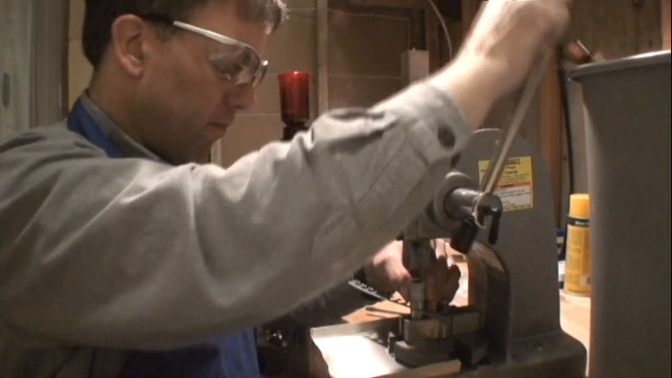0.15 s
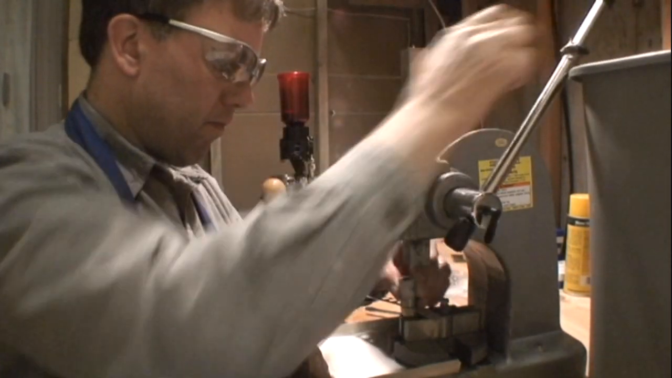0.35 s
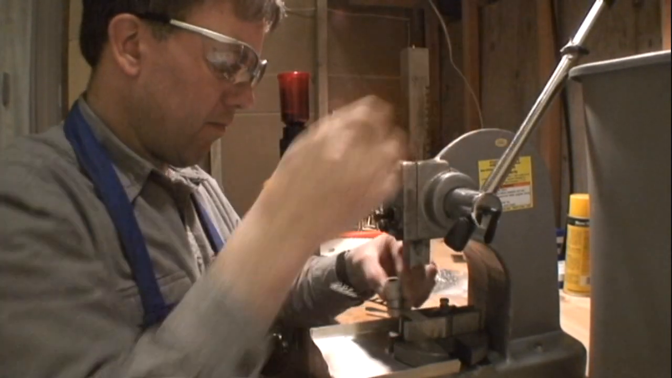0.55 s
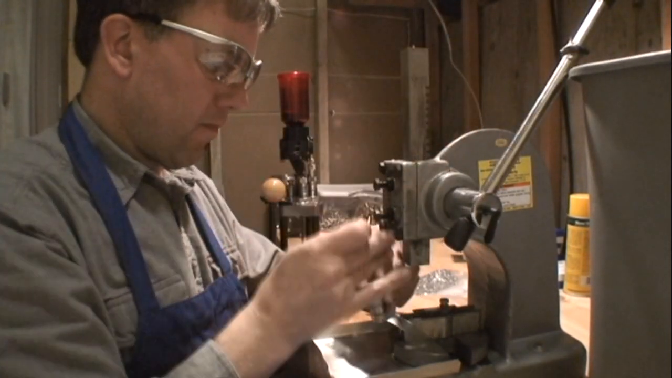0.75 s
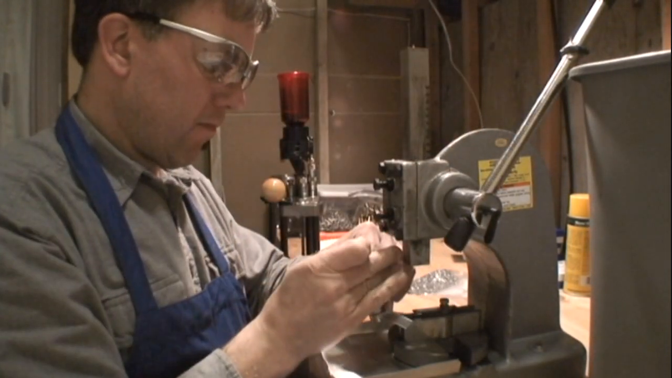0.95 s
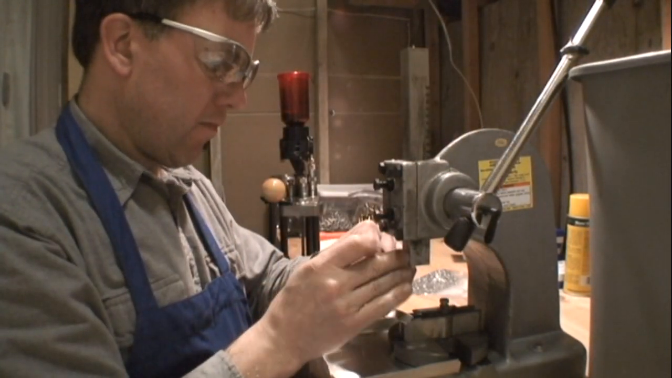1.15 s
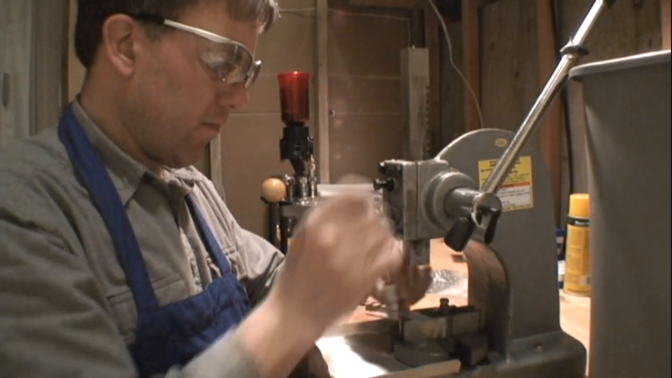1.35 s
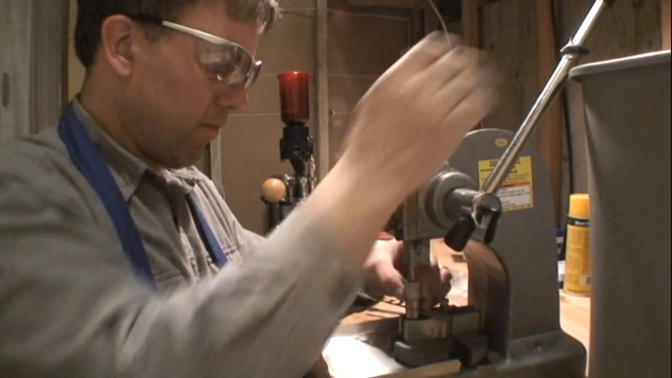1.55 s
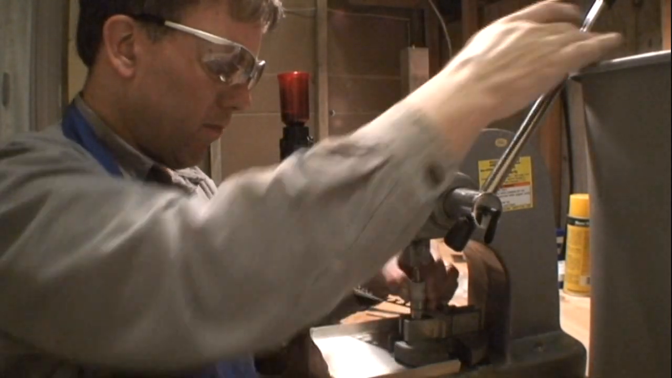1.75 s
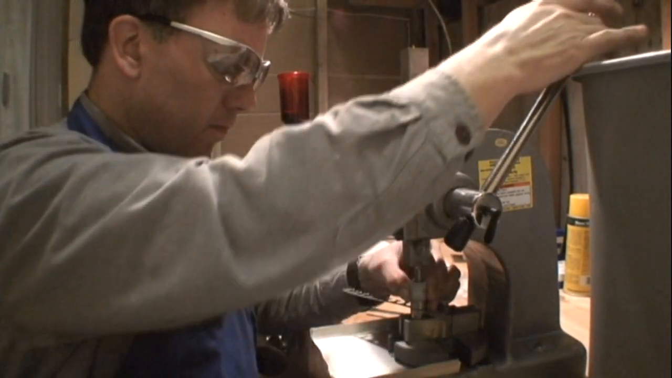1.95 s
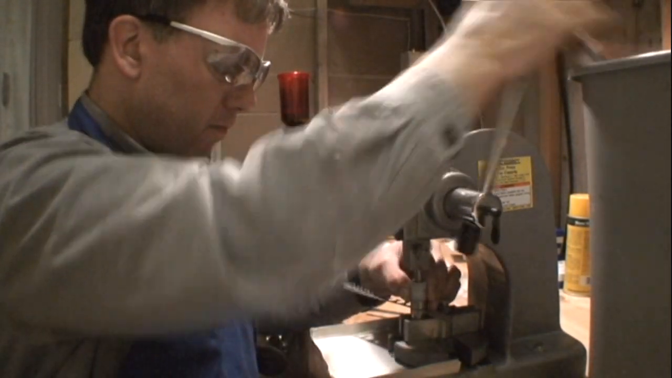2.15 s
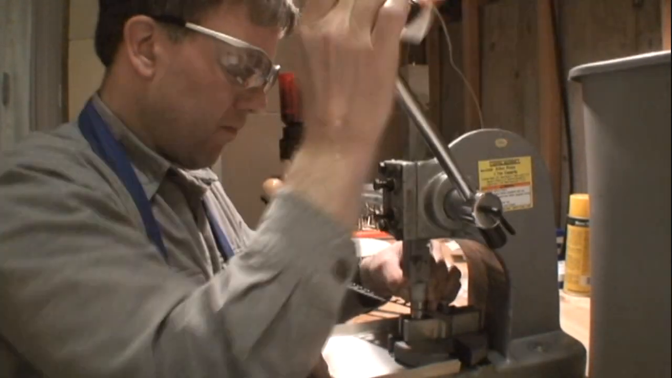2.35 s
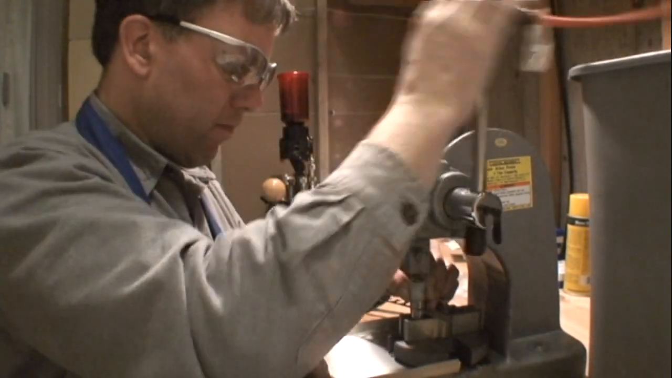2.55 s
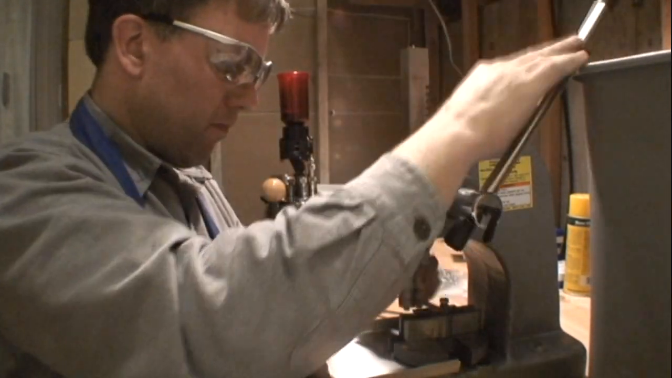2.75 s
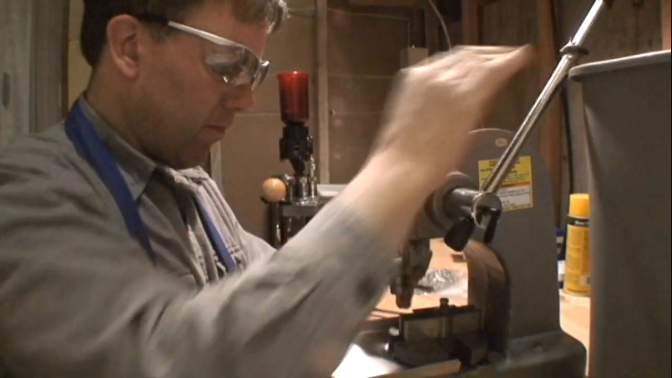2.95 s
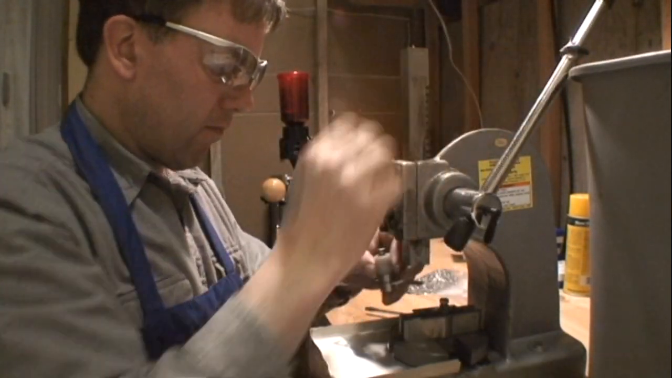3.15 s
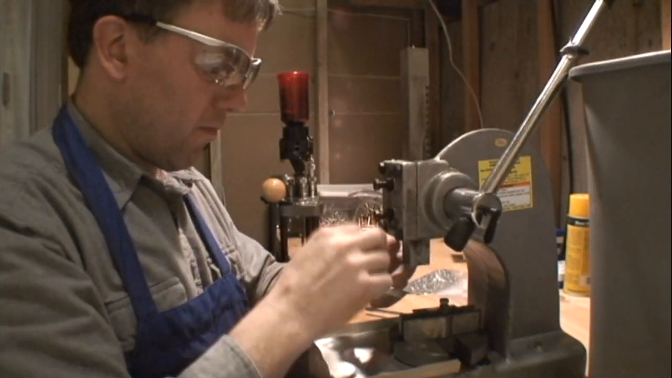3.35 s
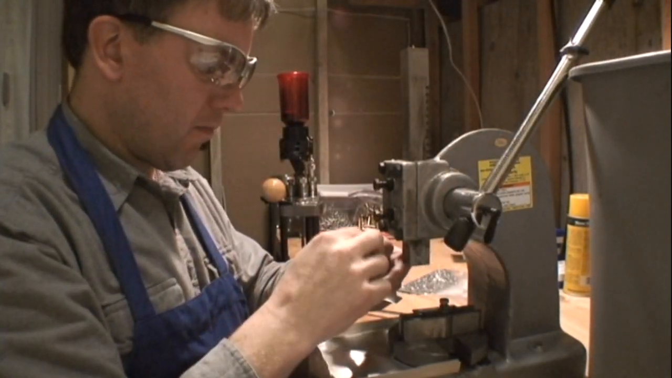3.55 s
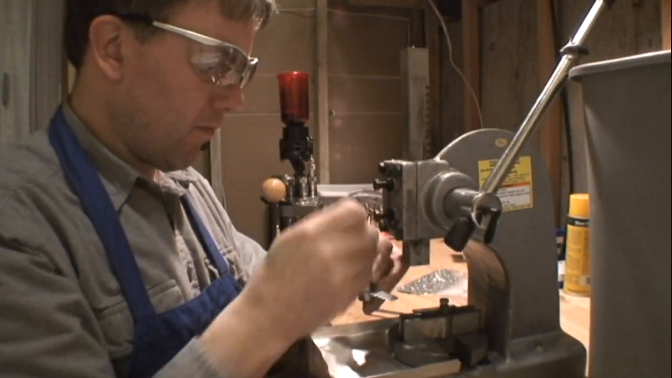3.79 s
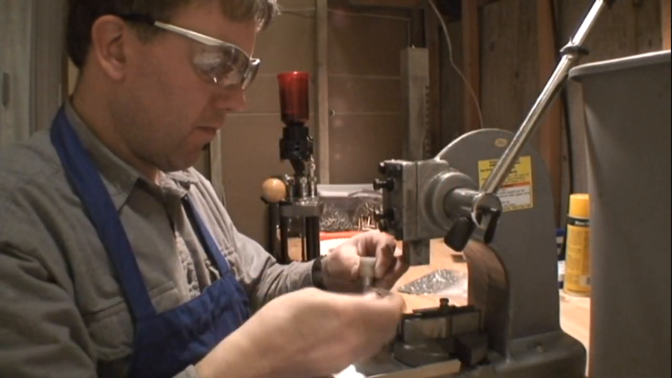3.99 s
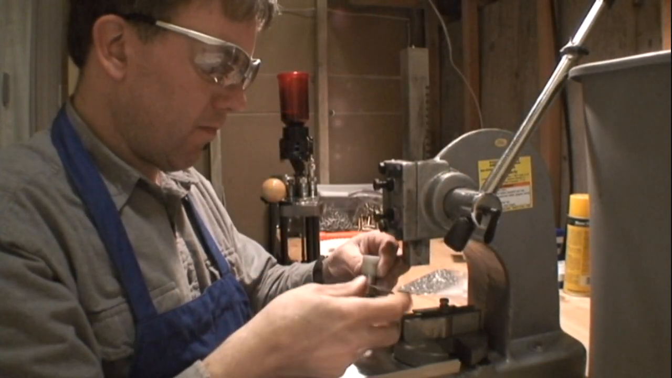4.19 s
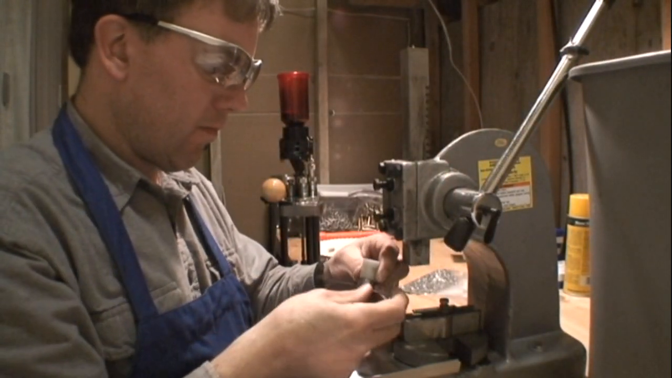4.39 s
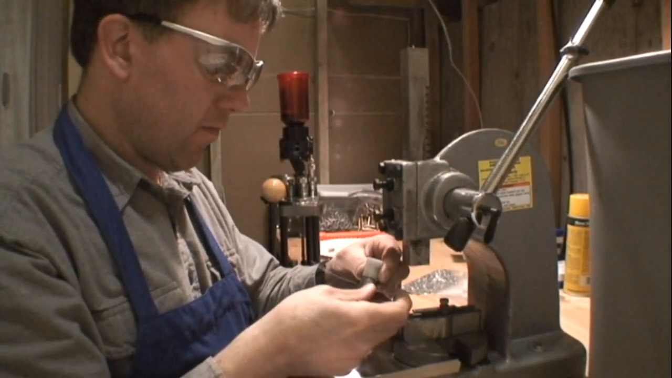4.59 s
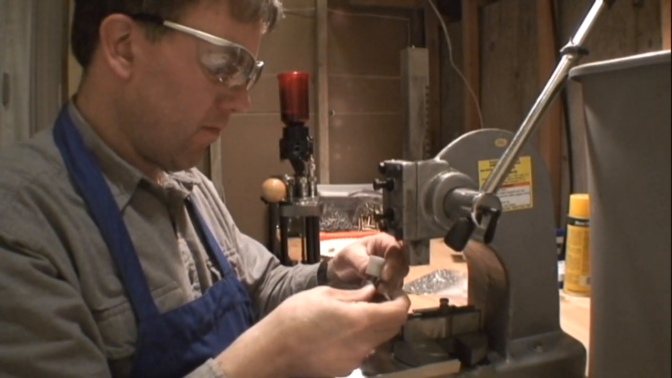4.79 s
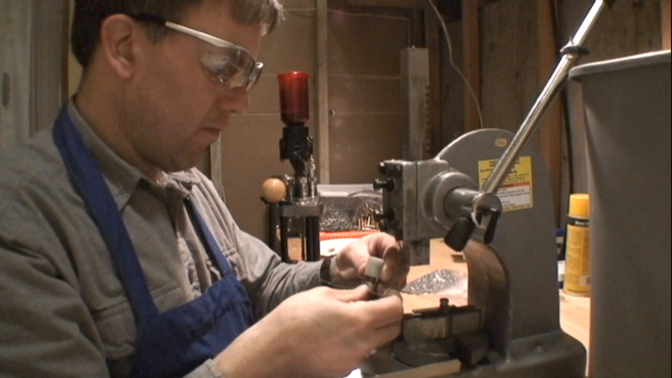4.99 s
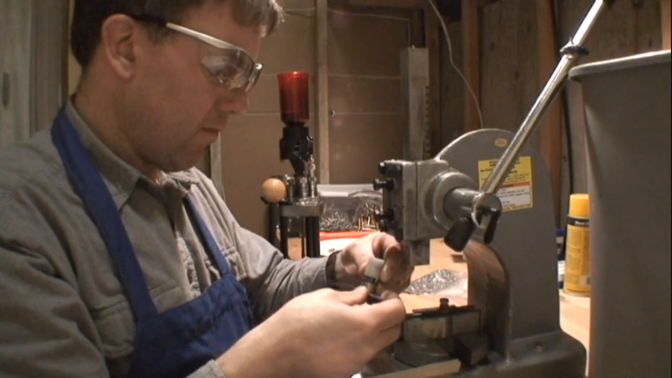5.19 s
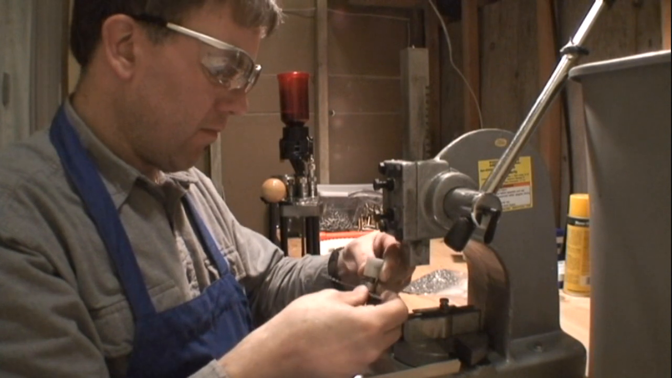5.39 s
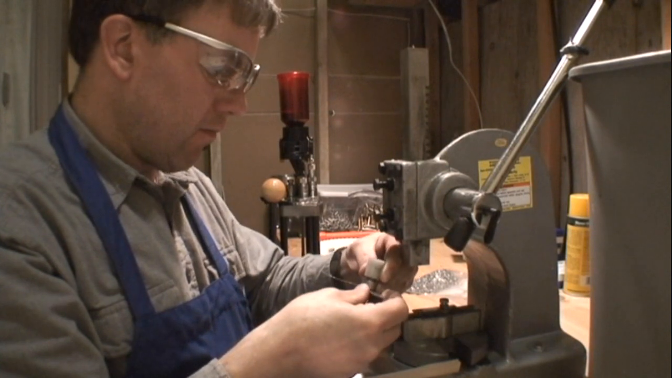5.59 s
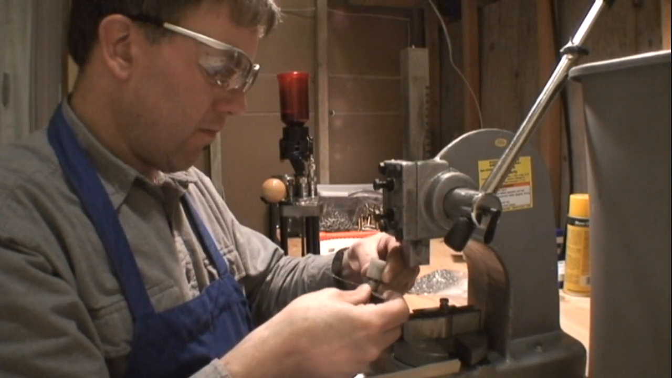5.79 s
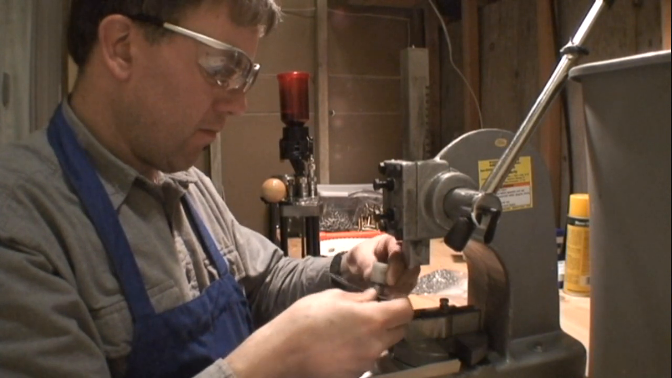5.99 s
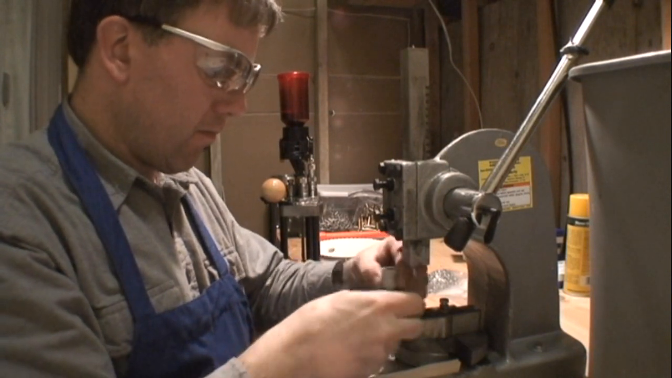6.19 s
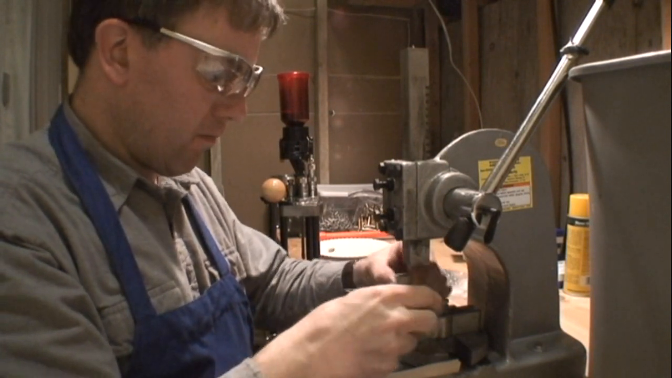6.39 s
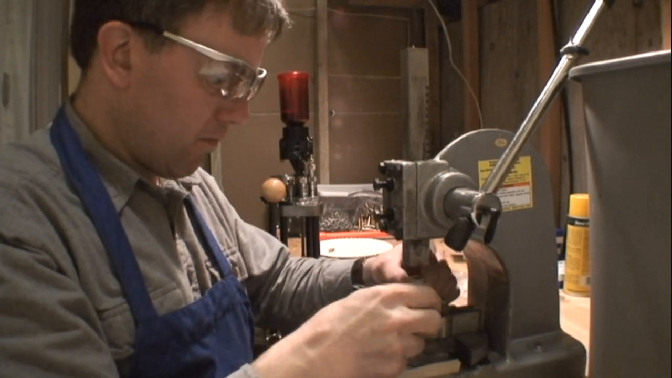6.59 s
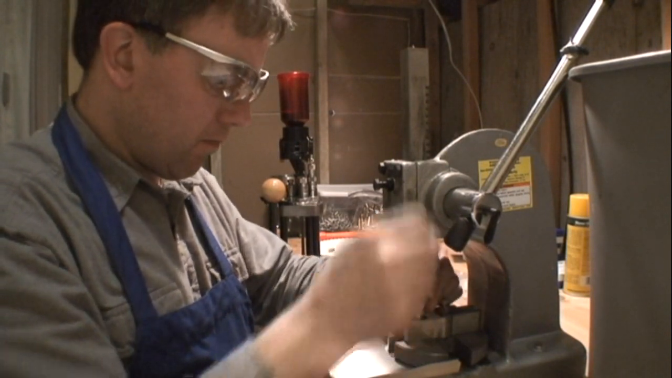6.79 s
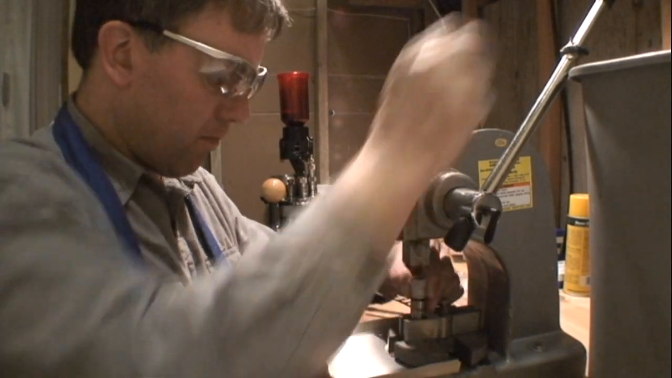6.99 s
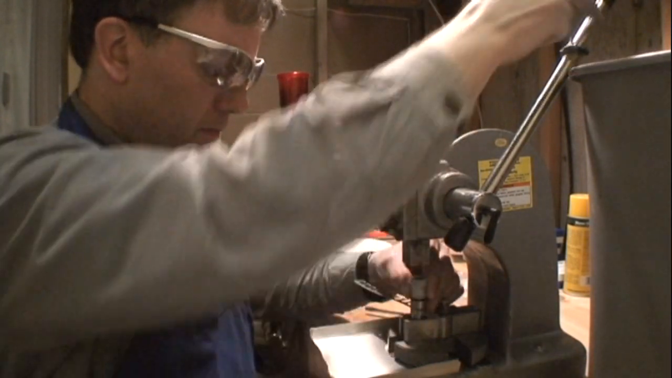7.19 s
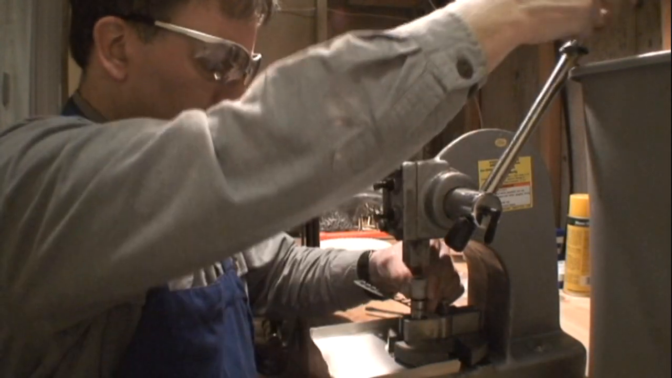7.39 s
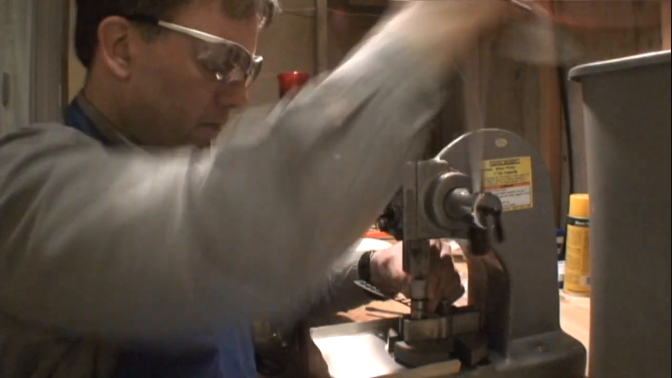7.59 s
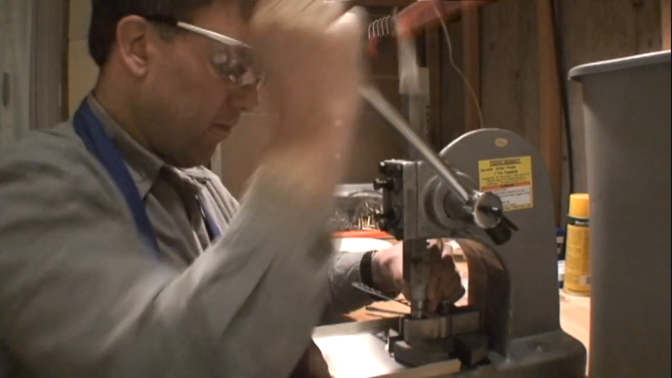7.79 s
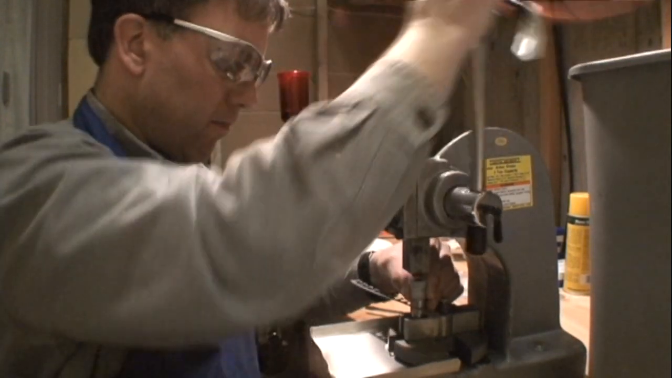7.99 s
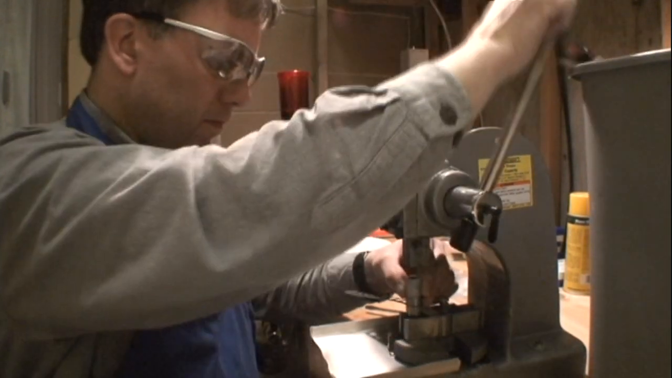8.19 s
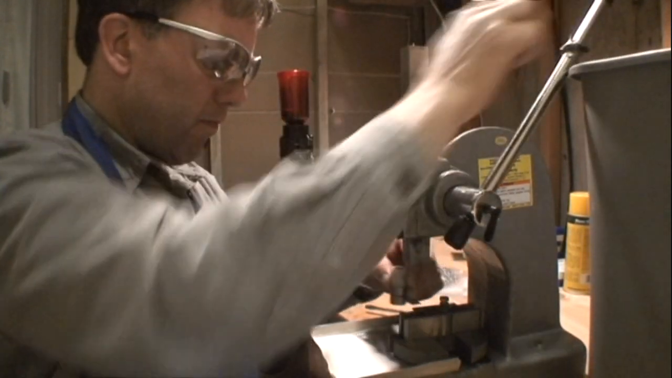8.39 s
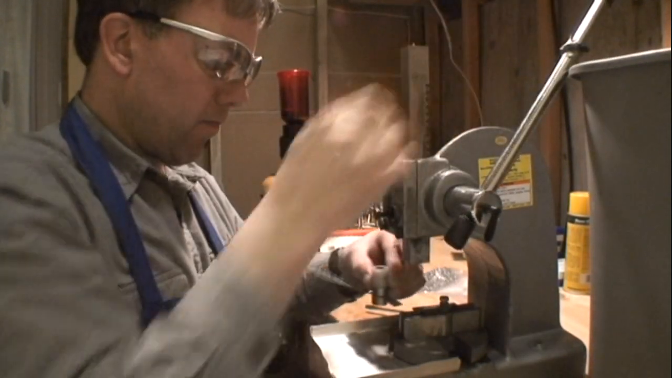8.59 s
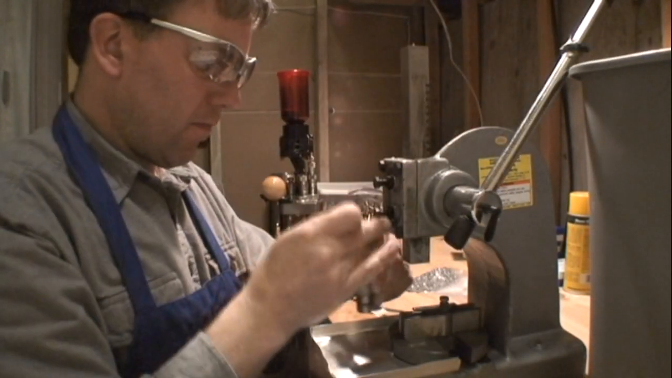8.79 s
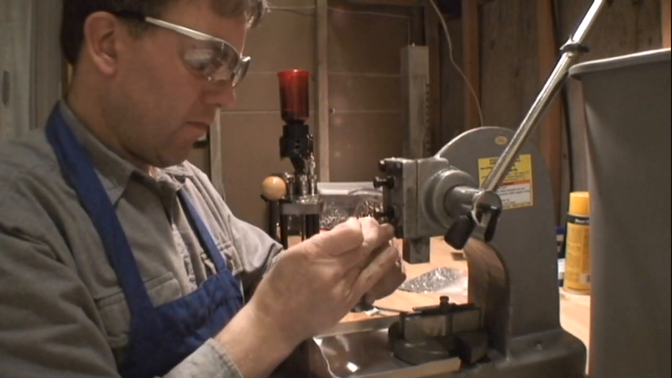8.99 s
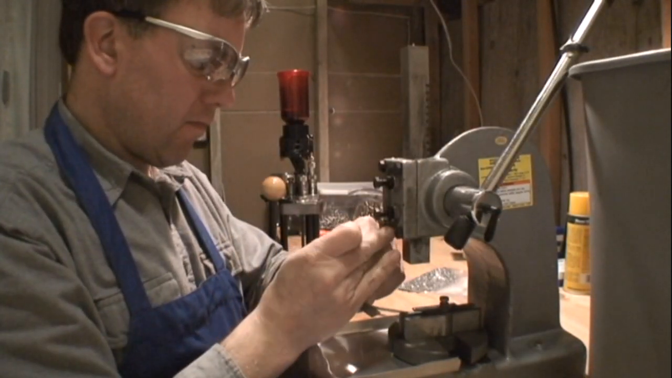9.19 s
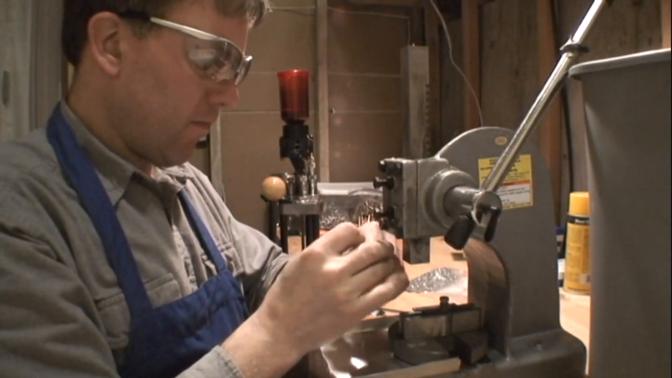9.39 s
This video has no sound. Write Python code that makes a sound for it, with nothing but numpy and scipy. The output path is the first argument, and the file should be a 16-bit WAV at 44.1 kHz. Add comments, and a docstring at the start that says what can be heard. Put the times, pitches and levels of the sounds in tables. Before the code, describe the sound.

In a small workshop, heard close in stereo, an iron lever press finishes a stroke with a double clank. Thin metal strip ticks and clinks on the die, then a stroke cracks and grinds through it and the lever and ram knock back. Lighter ticks and a brief scrape follow in a quieter gap before a second crunching stroke, another return clank and fine ticks. A sleeve rustles over faint hum.

```python
"""A hand-lever press cracks and grinds a punch through metal strip; then the lever knocks on its stop and the ram lands.
Between strokes the strip ticks, scrapes and clinks on the die, while a sleeve rustles over mains hum and still air.
Blows layer filtered noise, dense echoes and damped modes; tearing, judder and scraping are random impulses
played through such responses; cloth, air and bench sway are coloured noise, and the hum is a stack of sines."""
import sys
import numpy as np
from scipy import signal
from scipy.fft import rfft, irfft, next_fast_len
from scipy.io import wavfile
from scipy.ndimage import map_coordinates

SR = 44100
rng = np.random.default_rng(int(sys.argv[2]) if len(sys.argv) > 2 else 0)


def to_wav(sig):
    """Store sig (one row per channel, or 1-D mono) as 16-bit WAV at the path in sys.argv[1].

    Samples outside -1..1 are clipped; the rate is SR.
    """
    pcm = np.clip(np.atleast_2d(sig), -1, 1) * 32767
    pcm = np.round(pcm).astype(np.int16)
    wavfile.write(sys.argv[1], SR, pcm.T)  # frames by channels


N = 416744
RING = np.arange(SR // 2) / SR  # the time axis of one blow, s

# resonances of press and bench: (f/Hz, mean level/dB, t60/s)
PRESS_MODES = [(134, -17, 0.4), (251, -2, 0.2), (290, -9, 0.34), (387.9, 5.5, 0.13), (455.3, 0, 0.12),
               (614.4, -1, 0.23), (670, -3, 0.28), (913, 1, 0.14), (1049, -4.5, 0.13), (1257, -3, 0.25),
               (1376, -5.5, 0.15), (1522, -5.5, 0.2), (1590, -2, 0.13), (1885, -10, 0.2),
               (2570, -15.5, 0.249)]
# resonances of the strip on the die: (f/Hz, mean level/dB, t60/s)
DIE_MODES = [(1974, -7, 0.12), (2680, 6.5, 0.04), (3000, -17.5, .12), (3440, -0.5, 0.1), (3750, -4.5, 0.12),
             (4265, -12.5, 0.068), (4840, -0.5, 0.095), (5070, -4, 0.06), (6500, 0, 0.06),
             (7700, -0.5, 0.087), (8060, 1, 0.033), (8336, -1.5, 0.066)]
# tone colour of the shaken bench: (f/Hz, gain/dB)
BENCH_COLOUR = [(50, -13), (100, -7.5), (190, -5), (280, -6), (380, 1), (520, -3), (700, -7.5),
                (1100, -7.5), (1550, -7), (2100, -12.5), (3000, -22), (6000, -53), (16000, -76)]
# how long the bench's echoes last: (f/Hz, t60/s)
BENCH_DECAY = [(80, 0.39), (300, 0.22), (1000, 0.28), (2500, 0.21), (8000, .15)]
# how long the room's echoes last: (f/Hz, t60/s)
ROOM_DECAY = [(300, 0.33), (2000, 0.23), (5000, 0.18), (9000, 0.13), (15000, 0.064)]
# the punch working through the strip: (bite t/s, run-up/s, length/s, groan level/dB, drone level/dB,
# grinding level/dB, thud of its blows relative to their clang/dB before the trims in blow())
CUTS = [(2.298, 0.02, 0.22, -22.5, -27.5, -19, -8.5), (7.779, 0.069, 0.12, -19, -21, -21, -15)]
# the lever swings back to its stop and the ram follows:
# (lever t/s, lever level/dB, ram t/s, ram level/dB, length of the lift/s); levels before the trims in blow()
RETURNS = [(0.291, -7.5, 0.331, -2.5, 0.15), (2.821, -5.5, 2.853, -2.5, 0.12),
           (8.337, -10.5, 8.390, -8, 0.286)]
CUT_RELEASE_S = 0.038  # time constant as the load lets go


def amp(db):
    """Decibels to gain."""
    return 10 ** (np.asarray(db) / 20)


def unit(x):
    """Scale to rms 1 in the mid channel."""
    return x / np.sqrt(np.mean(x[0] ** 2) + 1e-20)


def unit_attack(x, size=512):
    """Scale a blow to mid rms 1 over its first moments (size in samples)."""
    return x / np.sqrt(np.mean(x[0, :size] ** 2) + 1e-20)


def along(points, hz):
    """Read (f/Hz, value) points along a log frequency axis."""
    f, v = np.transpose(points)
    return np.interp(np.log(hz + 1), np.log(f + 1), v)


def wobble(rate):
    """A smooth random curve, rate knots a second."""
    knots = rng.standard_normal(int(N * rate / SR) + 4)
    coarse = np.arange(0, N, 64)
    return np.interp(np.arange(N), coarse, map_coordinates(knots, [coarse * rate / SR]))


def coloured(x, colour):
    """Causal minimum-phase filter with the gain of (f/Hz, gain/dB) points."""
    m = 2 * next_fast_len(x.shape[-1] // 2 + 2048)
    cepstrum = irfft(np.log(amp(along(colour, np.fft.rfftfreq(m, 1 / SR)))))
    # folding the cepstrum forward puts the energy as early as possible
    cepstrum[1:m // 2] *= 2
    cepstrum[m // 2 + 1:] = 0
    return irfft(rfft(x, m) * np.exp(rfft(cepstrum)), m)[..., :x.shape[-1]]


def noise(colour):
    """Coloured mid and side noise, mid rms 1."""
    return unit(coloured(rng.standard_normal((2, N)), colour))


def tail(decay):
    """Dense echoes of mid energy 1; each frequency dies at its own speed."""
    hz, t, z = signal.stft(rng.standard_normal((2, len(RING))), SR, nperseg=256)
    fade = np.exp(-np.log(1000) * t / along(decay, hz)[:, None])
    x = signal.istft(z * fade, SR, nperseg=256)[1][:, :len(RING)]
    return x / np.linalg.norm(x[0])


def ringing(modes):
    """Damped modes of mid energy 1, with new random strengths and phases at every call."""
    hz, db, t60 = np.transpose(modes)
    waves = np.exp((2j * np.pi * hz[:, None] - np.log(1000) / t60[:, None]) * RING)
    strength = amp(db + rng.normal(0, 3.5, len(hz)))
    phase = np.exp(2j * np.pi * rng.random(len(hz)))
    z = (strength * phase) @ waves
    return np.array([z.imag, z.real]) / np.linalg.norm(z.imag)  # the side leads by a quarter turn


def contact(colour, decay, snap_s, echo_db):
    """A short, mostly central noise snap with wider dense echoes, mid energy 1."""
    snap = rng.standard_normal((2, len(RING))) * np.exp(-RING / snap_s) * [[1], [.5]]
    echoes = amp(echo_db) * tail(decay) * [[1], [1.4]]
    x = coloured(snap / np.linalg.norm(snap[0]) + echoes, colour)
    return x / np.linalg.norm(x[0])


def in_room(x):
    """A ring with the room's echoes, which make each mode swell and fade."""
    echoes = signal.fftconvolve(x[:1], tail(ROOM_DECAY), axes=1)[:, :len(RING)]
    return x + amp(-3) * echoes


def slips(rate, spread_db):
    """Random tiny impulses of uneven size, on average rate a second, rms 1."""
    hits = rng.random((1, N)) < rate / SR
    size = rng.standard_normal((1, N)) * amp(spread_db * rng.standard_normal((1, N)))
    return unit(hits * size)


def through(x, response):
    """Play x through an impulse response."""
    return signal.oaconvolve(x, response, axes=1)[:, :N]


def add(out, s, x):
    """Mix x into out at time s."""
    start = max(round(s * SR), 0)
    out[:, start:start + x.shape[1]] += x[:, :N - start]


def swell(s, attack_s, hold_s, release_s):
    """A gain that grows to 1 at time s, holds and dies away; attack and release are time constants."""
    t = np.arange(N) / SR - s
    return np.exp(-np.clip(np.maximum(-t / attack_s, (t - hold_s) / release_s), 0, 20))


def load():
    """The force on the ram builds over the run-up, holds through the cut and lets go."""
    return sum(amp(groan_db) * swell(s, run_up_s, length_s, CUT_RELEASE_S)
               for s, run_up_s, length_s, groan_db, *_ in CUTS)


def lift():
    """The ram rises fast, slows and halts when the lever meets its stop."""
    attack_s, release_share = 0.075, 0.38  # the decay time constant is a share of the lift
    t = np.arange(N) / SR
    return sum(swell(lever_s - lift_s, attack_s, 0, release_share * lift_s) * (t < lever_s)
               for lever_s, *_, lift_s in RETURNS)


def rocking():
    """Every cut, lift and stop sets the bench rocking: a gain envelope for its low rumble."""
    cut_db, lift_db, stop_db = -34.5, -32.5, -36
    attack_s, release_s = .03, 0.21
    kicks = [(s, length_s, cut_db) for s, _, length_s, *_ in CUTS]
    kicks += [(ram_s, 0, stop_db) for _, _, ram_s, *_ in RETURNS]
    kicked = sum(amp(db) * swell(s, attack_s, hold_s, release_s) for s, hold_s, db in kicks)
    return amp(lift_db) * lift() + kicked


def workshop():
    """Mains hum as slowly phase-drifting sines, still air as noise, and the bench rocking as deep noise."""
    # hum partials: (f/Hz, rms level/dB)
    hum_partials = [(59.2, -62.5), (118.4, -59.5), (236.9, -67.5), (479.1, -70), (570.6, -70), (662.1, -73)]
    # tone colour of the still air: (f/Hz, gain/dB)
    air_colour = [(20, -6.5), (60, -2), (90, -8.5), (125, -11), (170, -22.5), (250, -10), (330, -17),
                  (560, -15), (850, -21), (1150, -20), (1800, -25.5), (3400, -28), (6500, -29.5),
                  (7900, -29), (10000, -36.5), (16000, -38.5)]
    t = np.arange(N) / SR
    hum = sum(amp(db) * np.sqrt(2) * np.sin(2 * np.pi * hz * t + 0.26 * wobble(1.8)) for hz, db in hum_partials)
    sway = rocking() * noise([(10, -6.5), (24, -12), (45, -15), (65, -17), (120, -34.0), (400, -88)])
    return hum * np.array([[1], [0]]) + amp(-55.0) * noise(air_colour) + sway


def sleeve():
    """Heavy cloth flaps and hisses with the speed of the arm, which rises and falls in each swing."""
    # the arm reaching, pulling and sinking back: (middle t/s, half length/s, level/dB)
    swings = [(0.0, 0.46, -45.5), (0.665, 0.25, -57), (1.99, 0.47, -57), (2.78, 0.25, -49.5),
              (3.17, 0.41, -63), (3.8, 0.25, -60.5), (7.28, 0.36, -55.5), (8.28, 0.14, -46),
              (8.63, 0.31, -55)]
    # tone colour of the flapping folds: (f/Hz, gain/dB)
    flap_colour = [(100, -4.5), (400, -1.5), (1000, -5), (2500, -9), (6000, -37.5)]
    # tone colour of the cloth's hiss: (f/Hz, gain/dB)
    cloth_colour = [(1200, -4.5), (3000, -1), (8000, 1.5), (11000, -9), (16000, -25)]
    flap_db, hiss_db, resting_db = -3.5, -6, -62  # resting: the stir that never stops
    t = np.arange(N) / SR
    moving = sum(amp(db) * np.exp(-np.minimum(((t - s) / half_s) ** 2, 20)) for s, half_s, db in swings)
    speed = amp(resting_db) + moving
    flap = amp(flap_db + 1.7 * wobble(22)) * noise(flap_colour)
    hiss = amp(hiss_db + 1.4 * wobble(11.0)) * noise(cloth_colour)
    return speed * (flap + hiss)


def strip():
    """Thin metal ticks and chatters, brighter at sharper contacts, and scrapes along edges in tiny slips."""
    # strip handled in the fingers: (t/s, level/dB before trim, pitch centre f/Hz, loss per rebound/dB)
    ticks = [(0.9872, -23, 2050, 4.5), (1.1385, -23, 5000, -0.5), (1.1709, -21.5, 2480, 14.5),
             (1.3134, -16, 8000, 16.5), (3.735, -23, 9300, 3), (3.772, -17.5, 9600, 10),
             (4.107, -35.5, 9200, 12), (4.747, -20, 3290, 0), (4.8413, -37, 3630, -0.5),
             (6.217, -21, 6360, 15), (6.2819, -33.5, 4880, 4), (6.342, -32, 6440, 19),
             (9.1068, -41.5, 1800, 10), (9.21, -21.5, 11020, 14), (9.2596, -25, 8650, 22),
             (9.2957, -28.5, 1760, 20), (9.3079, -21, 9200, 10.5), (9.3572, -31.5, 2500, 24)]
    # the strip sliding on metal: (t/s, level/dB, attack/s, release/s, pitch f/Hz)
    slides = [(1.15, -50, 0.0054, 0.18, 5500), (3.745, -41, 0.033, .035, 8960),
              (4.755, -21.5, .005, 0.021, 3300), (4.87, -46.5, 0.03, 0.036, 3800),
              (5.005, -50.5, 0.054, 0.16, 3440), (6.21, -50.5, 0.074, .11, 6940),
              (9.27, -56, .04, .07, 9000)]
    # resonances of the loose strip: (f/Hz, mean level/dB, t60/s)
    strip_modes = [(2176, -1, 0.064), (3340, -3.5, 0.052), (5970, -6, 0.067), (6700, -7, .1),
                   (8300, -2, .1), (9300, -2.5, 0.07), (14400, -7, .05)]
    # tone colour of a tick: (f/Hz, gain/dB)
    thin_colour = [(300, -24.5), (1000, -3.5), (1800, 2.5), (3000, -5), (6000, 1), (9000, -0.5),
                   (11500, -10), (16000, -15)]
    # tone colour of a scrape: (f/Hz, gain/dB)
    slide_colour = [(900, -33), (2500, -5), (3150, 1), (3750, -3), (4400, 0), (6000, 3.5), (8000, 1.5),
                    (10000, -5.5), (16000, -20.5)]
    chatter_s = .012  # typical flight between the rebounds of a tick
    scrape_ring_db, scrape_q = 3.5, 7  # each scrape brings out one resonance of the strip
    out = np.zeros((2, N))
    for s, db, centre_hz, loss_db in ticks:
        for k in range(3):
            tick = contact(thin_colour, ROOM_DECAY, snap_s=0.0026, echo_db=-1.5)
            tick = tick + amp(-8.5) * in_room(ringing(strip_modes))
            tick = coloured(tick, [(centre_hz / 1.9, -6), (centre_hz, 0), (centre_hz * 1.6, -4)])
            add(out, s, amp(db - 15.0 - k * loss_db) * unit_attack(tick))
            s += chatter_s * np.exp(.15 * rng.standard_normal())
    edge = contact(slide_colour, ROOM_DECAY, snap_s=0.00016, echo_db=4.5) + amp(-21) * ringing(strip_modes)
    rubbing = through(slips(rate=640, spread_db=-1.5), edge)
    for s, db, attack_s, release_s, hz in slides:
        ring = signal.lfilter(*signal.iirpeak(hz, scrape_q, fs=SR), rubbing)
        scrape = unit(rubbing + amp(scrape_ring_db) * ring)
        out += amp(db) * swell(s, attack_s, 0, release_s) * scrape
    return out


def bench_blow():
    """The iron frame rings and shakes the wooden bench."""
    return contact(BENCH_COLOUR, BENCH_DECAY, snap_s=.006, echo_db=1) + amp(-1.5) * ringing(PRESS_MODES)


def die():
    """The strip strikes the hard die; the point of contact favours some modes; a knock passes to the bench."""
    # the strip set against the die: (t/s, clink level/dB before trim, knock level/dB before trim, ring f/Hz)
    clinks = [(0.1931, -27, -54, 2930), (1.577, -19.5, -50, 3470), (1.6401, -21.5, -46.5, 2710),
              (1.734, -29.5, -62, 3680), (1.8343, -13, -41.5, 4700), (6.5621, -10.5, -50.5, 6680),
              (6.7446, -11.5, -45.5, 5050)]
    # tone colour of a clink: (f/Hz, gain/dB)
    clink_colour = [(300, -24.5), (1200, -14), (2000, -1.5), (3200, 0), (5000, -4), (8500, -3.5),
                    (11000, -7), (16000, -27)]
    out = np.zeros((2, N))
    for s, db, knock_db, ring_hz in clinks:
        clink = contact(clink_colour, ROOM_DECAY, snap_s=.0018, echo_db=-4)
        clink = clink + amp(-2) * in_room(ringing(DIE_MODES))
        clink = coloured(clink, [(ring_hz / 1.3, -5.5), (ring_hz, 1), (ring_hz * 1.2, -5), (ring_hz * 4, -10)])
        add(out, s, amp(db - 14.0) * unit_attack(clink))
        add(out, s, amp(knock_db + 4) * unit_attack(bench_blow()))
    return out


def ram():
    """The rack judders in its guide, as slips through the frame, and now and then squeaks with a wavering tone."""
    # dry steel squeaks: (t/s, f/Hz, level/dB, length/s)
    squeaks = [(2.82, 5500, -33, 0.03), (7.742, 7850, -32, 0.033), (8.283, 2610, -36.5, 0.051)]
    under_groan_db, lift_db = -2, -33.5  # judder on the way down, and on the way up
    frame_colour = [(100, -18.5), (250, -12.5), (380, 3.5), (520, -2.5), (800, -8.5), (1500, -22),
                    (4000, -31), (12000, -41.5)]
    frame = contact(frame_colour, BENCH_DECAY, snap_s=0.0073, echo_db=-5.5)
    judder = unit(through(slips(rate=160, spread_db=0.5), frame))
    out = (amp(under_groan_db) * load() + amp(lift_db) * lift()) * judder
    for s, hz, db, length_s in squeaks:
        size = int(length_s * SR)
        turns = np.cumsum(hz * (1 + 0.021 * wobble(450)[:size])) / SR
        add(out, s, amp(db) * np.hanning(size) * np.sin(2 * np.pi * turns) * [[1], [0]])
    return out


def shear():
    """The punch tears through in uneven slips: the frame groans and drones, and the cut edges grind."""
    # tone colour of the grinding edges: (f/Hz, gain/dB)
    grind_colour = [(500, -40), (950, -9.5), (2500, -7.5), (4400, -6.5), (6000, -12.5), (9000, -14.5),
                    (12000, -23.5), (16000, -48.5)]
    # the frame under strain: (f/Hz, mean level/dB, t60/s)
    drone_modes = [(627, -2, .18), (672, 2.5, .2), (738, -4, .18)]
    bite_s = 0.00404  # attack time constant: the grinding starts at once
    groan_sag, grind_sag = 25, 57.5  # dB/s: the frame relaxes as the punch sinks in, and the metal gives
    tearing = slips(rate=380, spread_db=3)
    frame = ringing(PRESS_MODES) + contact(BENCH_COLOUR, BENCH_DECAY, snap_s=0.01, echo_db=-5.5)
    groan_colour = [(35, 2), (70, -0.5), (200, -11), (450, -3.5), (700, 3), (950, -3.0), (3000, -2.0)]
    groan = unit(coloured(through(tearing, frame), groan_colour))
    drone = unit(through(tearing, ringing(drone_modes)))
    edges = contact(grind_colour, ROOM_DECAY, snap_s=0.00032, echo_db=4.0) + amp(-8) * ringing(DIE_MODES)
    grind = unit(through(tearing, edges))
    out = np.zeros((2, N))
    for s, _, length_s, groan_db, drone_db, grind_db, _ in CUTS:
        sunk_s = np.clip(np.arange(N) / SR - s, 0, length_s)
        cut = amp(groan_db - groan_sag * sunk_s) * groan
        cut = cut + amp(drone_db) * drone
        cut = cut + amp(grind_db - grind_sag * sunk_s) * grind
        out += swell(s, bite_s, length_s, CUT_RELEASE_S) * cut
    return out


def blow(clang_db, thud_db, crack_db, treble_db=0):
    """Each blow has a low thud, an iron clang and a crack of steel on steel."""
    # tone colour of the crack: (f/Hz, gain/dB)
    crack_colour = [(500, -19.5), (1500, 0), (2800, 3.5), (4600, 4), (7500, -1.5), (10000, -7.5),
                    (12000, -17.5), (16000, -30.5)]
    # the body splits at 470 Hz into thud and clang
    below, above = (signal.butter(3, 470, kind, fs=SR, output="sos") for kind in ("low", "high"))
    body = bench_blow()
    thud = unit_attack(signal.sosfilt(below, body))
    clang = unit_attack(signal.sosfilt(above, body))
    crack = contact(crack_colour, ROOM_DECAY, snap_s=.0014, echo_db=-3) + amp(-16.0) * ringing(DIE_MODES)
    crack = unit_attack(coloured(crack, [(5000, 0), (11000, treble_db)]))
    return amp(thud_db - 2.5) * thud + amp(clang_db - 10) * clang + amp(crack_db - 13.5) * crack


def loaded_thud_db(s):
    """The blows of one stroke all shake the bench by the same share: that of the nearest cut."""
    return min(CUTS, key=lambda cut: abs(cut[0] - s))[-1]


def press():
    """Knocks and snaps on the way down; on the way back the lever hits its stop, then the ram, which bounces."""
    # slack in the rack taken up under load: (t/s, clang level/dB before the trim in blow())
    knocks = [(2.261, -21), (2.362, -5), (7.582, -31.5), (7.686, -19), (7.723, -6.5), (7.752, -10.5),
              (7.916, -5), (7.927, -6), (8.017, -20.5)]
    # the strip fracturing under the punch:
    # (t/s, crack level/dB, clang level/dB, treble tilt of the crack/dB); levels before the trims in blow()
    snaps = [(2.285, -7.5, -9.5, 10), (2.290, -1, -13.5, 12), (2.376, -12, -15, 22.5),
             (2.393, -3, -3.5, 3.5), (2.495, -7.5, -9.5, 3), (2.502, -12, -16.5, 1),
             (2.533, -21, -23.5, 16), (7.779, -3.5, -6.5, 1.5), (7.787, -5, -4.5, 5)]
    # soft bumps of hand and ram: (t/s, level/dB before trim)
    bumps = [(0.145, -28.5), (1.653, -36), (2.145, -38.5), (2.62, -25), (2.652, -28), (3.245, -49),
             (6.289, -37.5), (6.805, -30.5), (7.04, -46), (7.155, -41), (7.295, -41), (7.509, -36.5),
             (7.615, -25), (8.03, -26), (8.142, -30), (8.229, -30)]
    # relative to the clang, before the trims in blow()
    knock_crack_db, lever_crack_db, ram_crack_db, return_thud_db = -12, -17.5, -7.5, -6.5
    rebound_s, rebound_db, rebound_crack_db = .039, -7.5, -29  # the ram bounces once
    out = np.zeros((2, N))
    for s, db in knocks:
        add(out, s, blow(db, db + loaded_thud_db(s), db + knock_crack_db))
    for s, crack_db, clang_db, treble_db in snaps:
        add(out, s, blow(clang_db, clang_db + loaded_thud_db(s), crack_db, treble_db))
    for lever_s, lever_db, ram_s, ram_db, _ in RETURNS:
        stops = [(lever_s, lever_db, lever_crack_db),
                 (ram_s, ram_db, ram_crack_db),
                 (ram_s + rebound_s, ram_db + rebound_db, rebound_crack_db)]
        for s, db, crack_db in stops:
            add(out, s, blow(db, db + return_thud_db, db + crack_db))
    for s, db in bumps:
        bump = coloured(bench_blow(), [(150, -4.5), (400, 5.0), (800, -1.5), (2000, -6)])
        add(out, s, amp(db - 7.5) * unit_attack(bump))
    return out


def stereo(x, width, lean):
    """Mid and side to left and right at two closely spaced microphones."""
    side = coloured(x[1], width)
    m = next_fast_len(N + 4096)
    hz = np.fft.rfftfreq(m, 1 / SR)
    # the lower tones reach the left side a little earlier
    early = np.exp(1j * np.pi * hz / SR / (1 + (hz / 3000) ** 2))
    left = amp(along(lean, hz) / 2) * early
    return irfft(rfft([x[0] + side, x[0] - side], m) * [left, 1 / left], m)[:, :N]


def scene():
    """The press leans to the left; the hands lean left mainly around 1300 Hz; the room sound is near centre."""
    # stereo spread of press and hands: (f/Hz, side gain/dB)
    near_width = [(100, -22), (400, -18), (1000, -14), (2200, -9), (5000, -11), (9000, -11), (13000, -19)]
    # stereo spread of cloth and workshop: (f/Hz, side gain/dB)
    air_width = [(110, -10.5), (250, -4), (2400, -1.5), (8000, -5.5), (15000, -10.5)]
    # balance of the press: (f/Hz, left minus right/dB)
    press_lean = [(100, -1.5), (380, 2.5), (700, 3.5), (1290, 6.5), (2380, 4), (4400, -1.8), (15000, 0)]
    machine = stereo(press() + shear() + ram(), near_width, press_lean)
    handled = (die() + strip()) * amp([[0], [2]])  # a little extra side
    hands = stereo(handled, near_width, [(200, -1.0), (1300, 8.0), (5000, -1.5)])
    room = stereo(sleeve() + workshop(), air_width, [(200, 0.071), (1300, 1.3), (5000, 0.028)])
    return machine + hands + room


def record(dry):
    """Soft saturation rounds off the highest peaks; a steep low-pass then removes everything above top_hz."""
    top_hz = 16000
    rounded = dry / (1 + np.abs(dry) ** 6) ** (1 / 6)
    m = next_fast_len(N + 4096)
    return irfft(rfft(rounded, m) * (np.fft.rfftfreq(m, 1 / SR) < top_hz), m)[:, :N]


dry = scene()
out = record(dry)
to_wav(out)
```